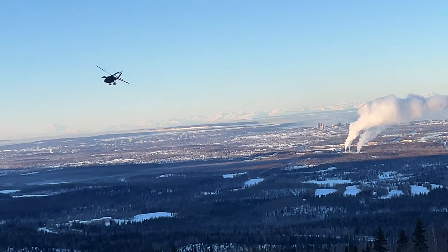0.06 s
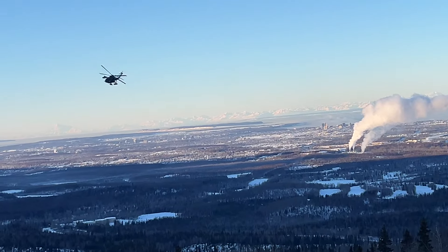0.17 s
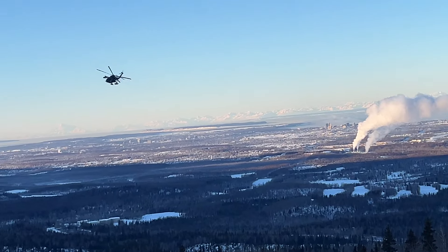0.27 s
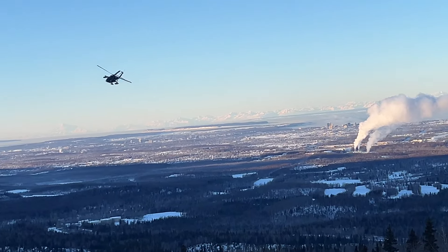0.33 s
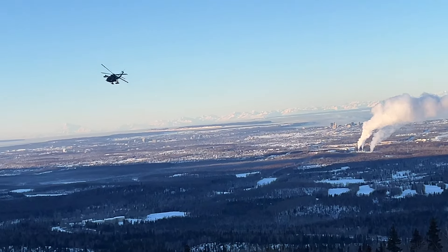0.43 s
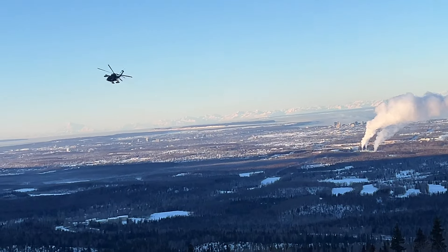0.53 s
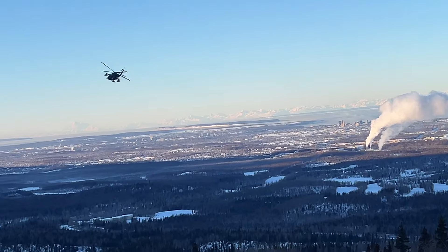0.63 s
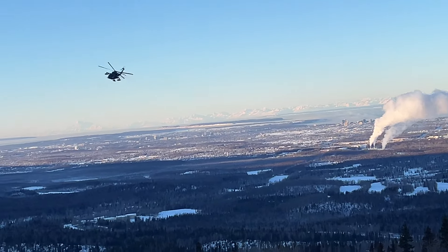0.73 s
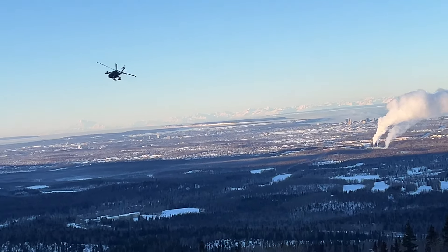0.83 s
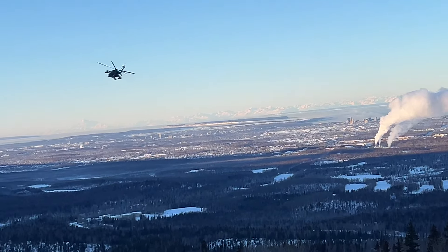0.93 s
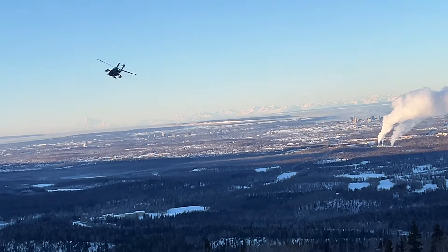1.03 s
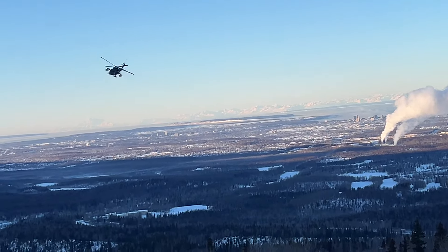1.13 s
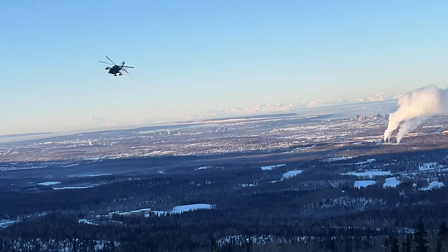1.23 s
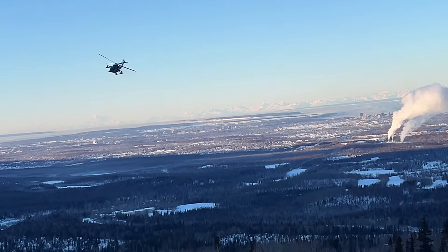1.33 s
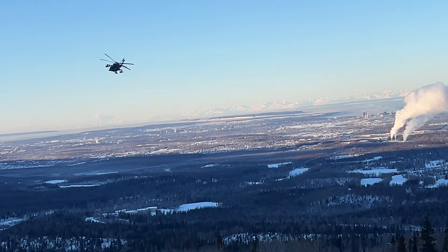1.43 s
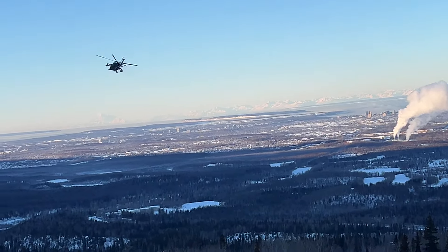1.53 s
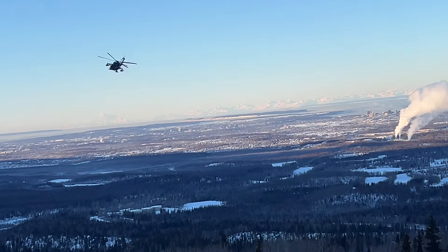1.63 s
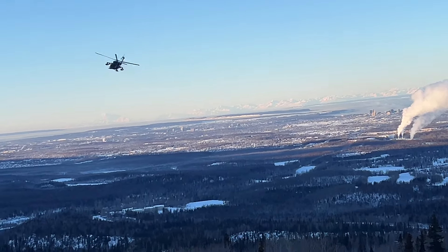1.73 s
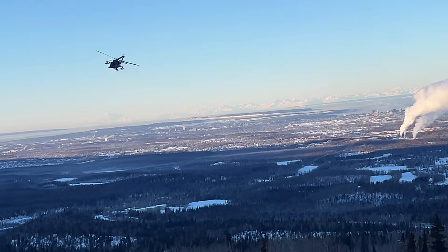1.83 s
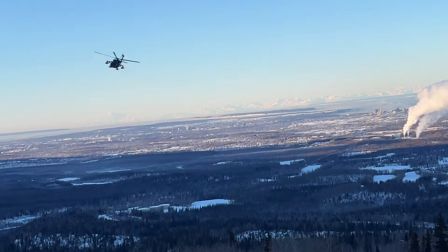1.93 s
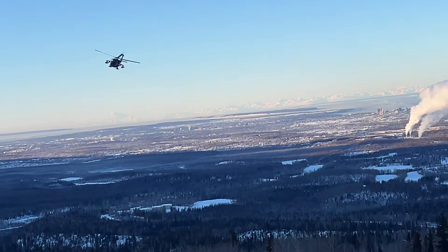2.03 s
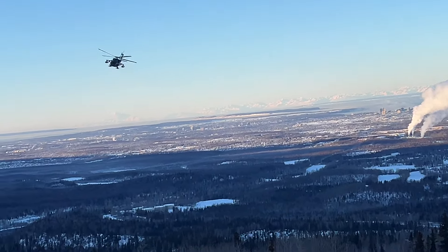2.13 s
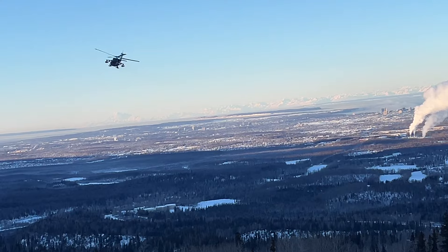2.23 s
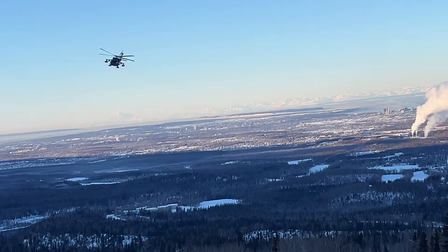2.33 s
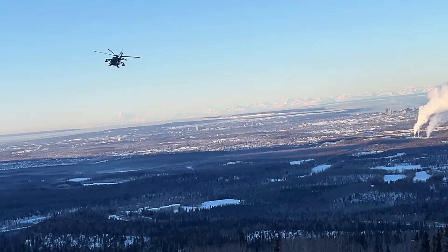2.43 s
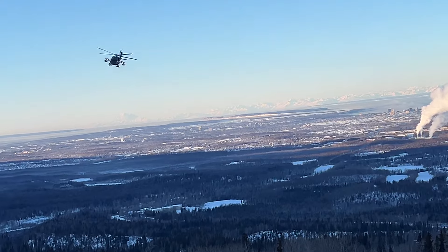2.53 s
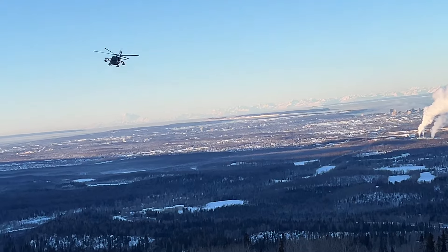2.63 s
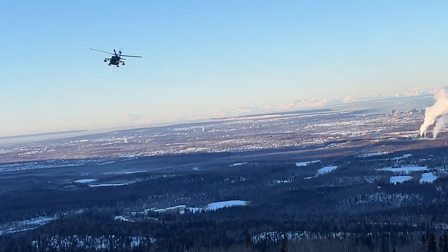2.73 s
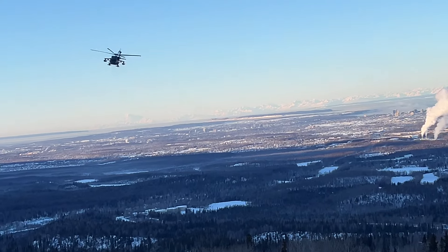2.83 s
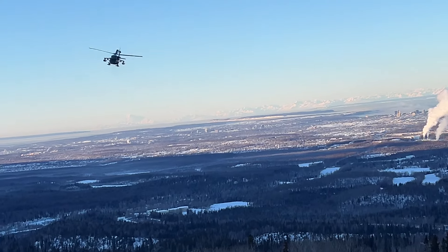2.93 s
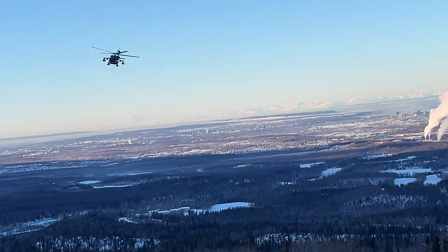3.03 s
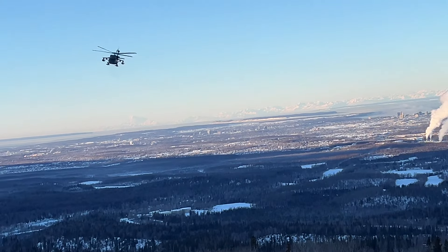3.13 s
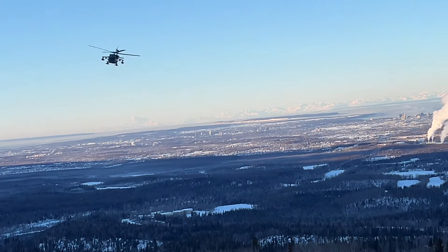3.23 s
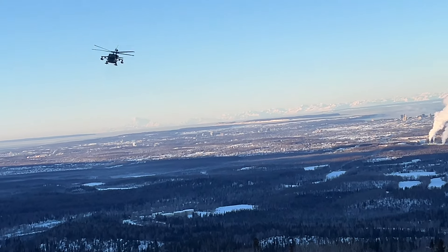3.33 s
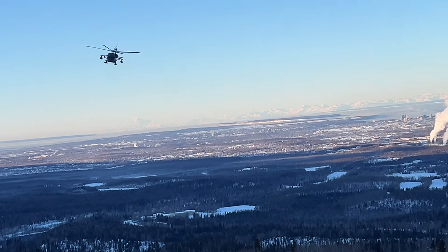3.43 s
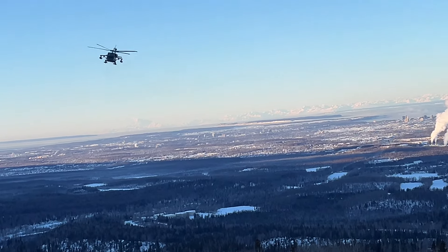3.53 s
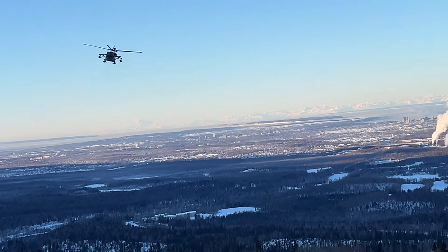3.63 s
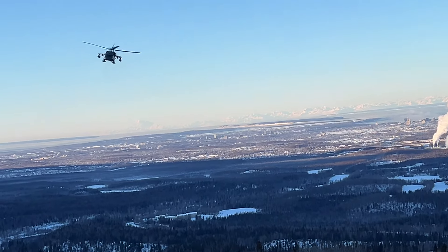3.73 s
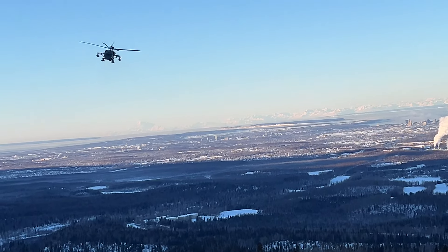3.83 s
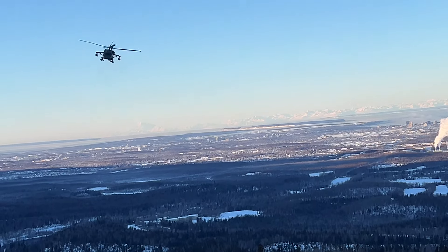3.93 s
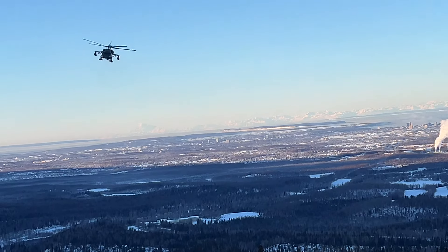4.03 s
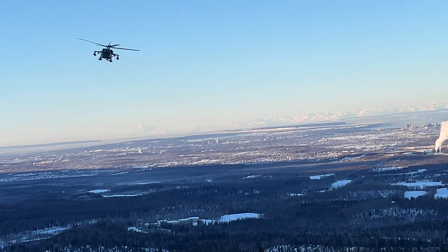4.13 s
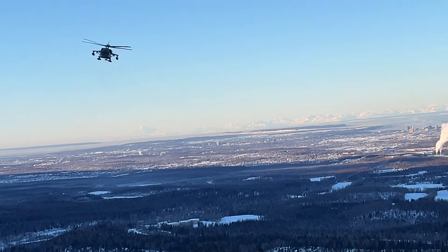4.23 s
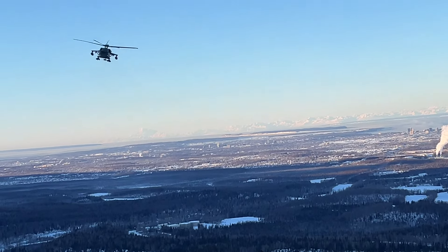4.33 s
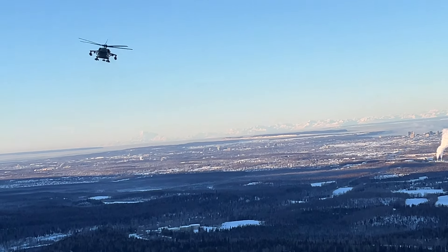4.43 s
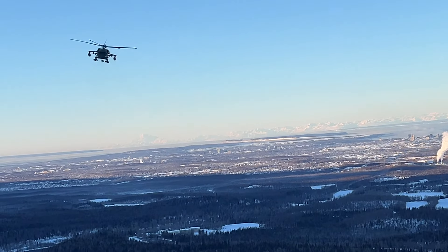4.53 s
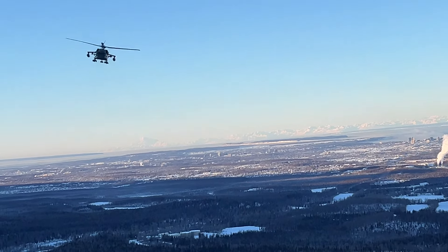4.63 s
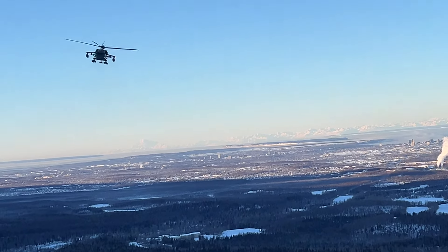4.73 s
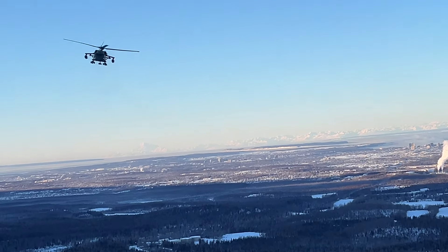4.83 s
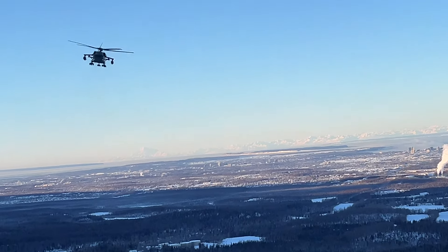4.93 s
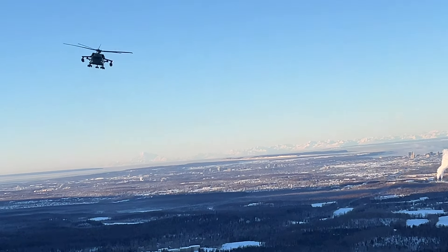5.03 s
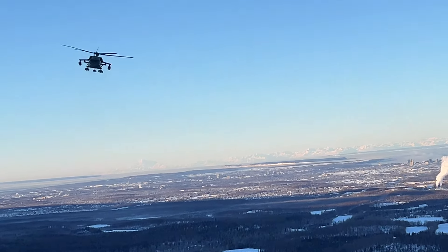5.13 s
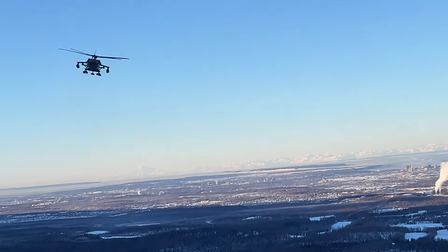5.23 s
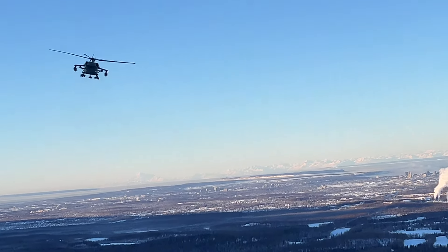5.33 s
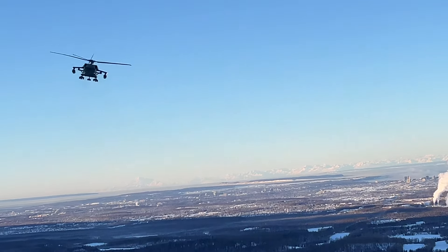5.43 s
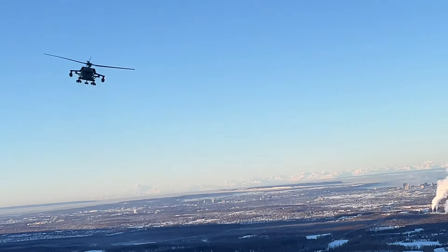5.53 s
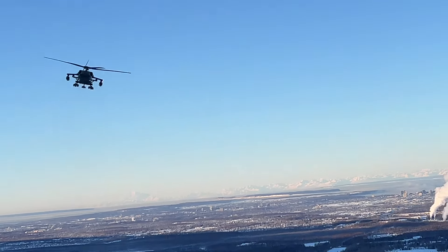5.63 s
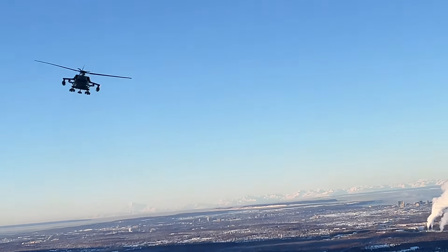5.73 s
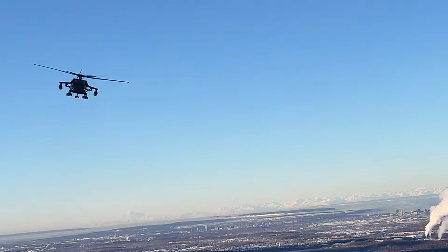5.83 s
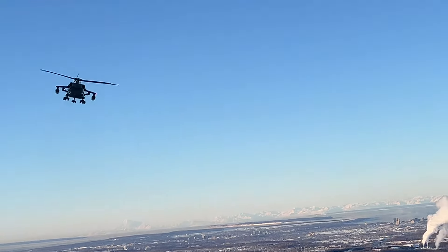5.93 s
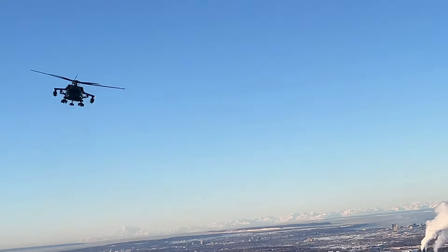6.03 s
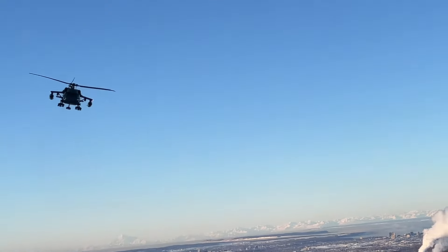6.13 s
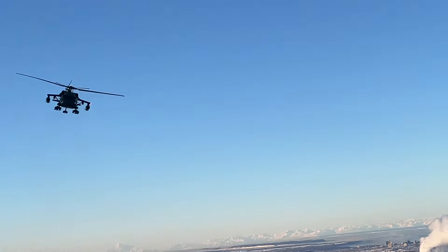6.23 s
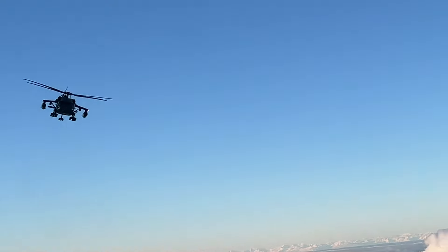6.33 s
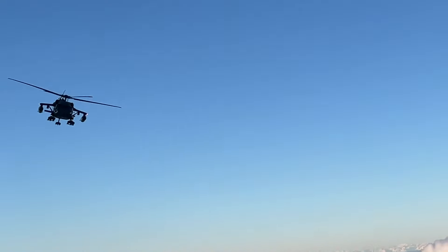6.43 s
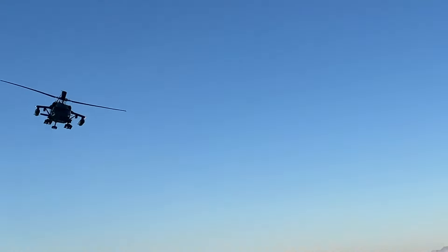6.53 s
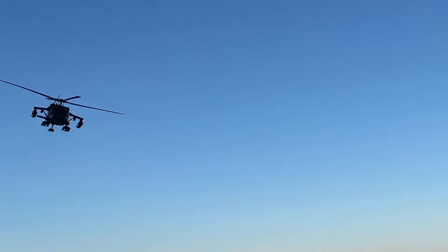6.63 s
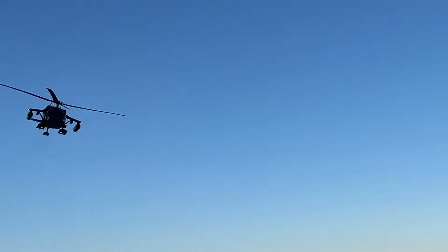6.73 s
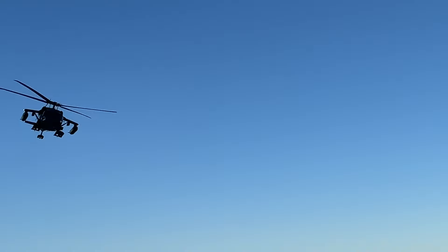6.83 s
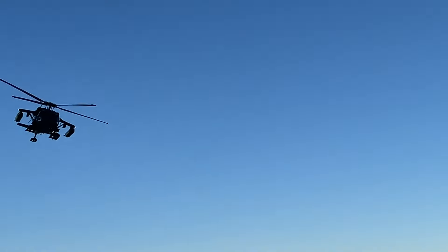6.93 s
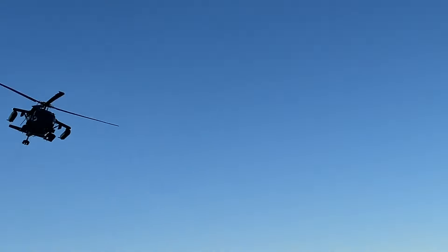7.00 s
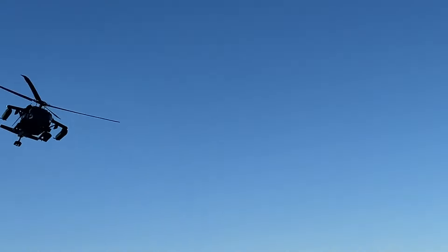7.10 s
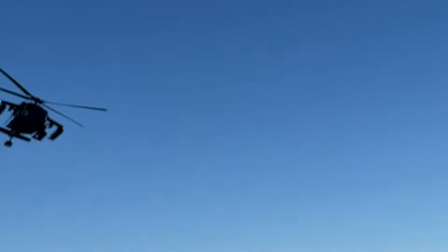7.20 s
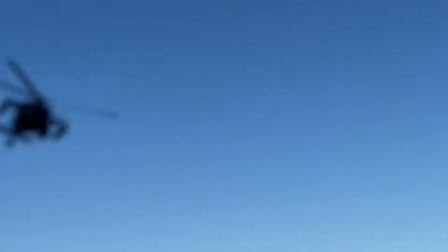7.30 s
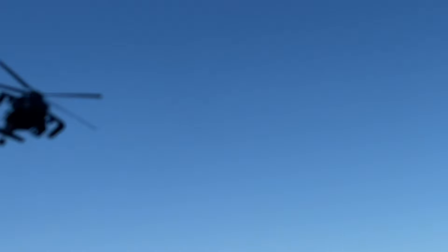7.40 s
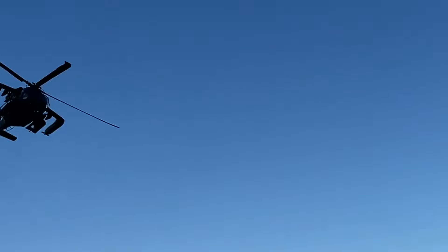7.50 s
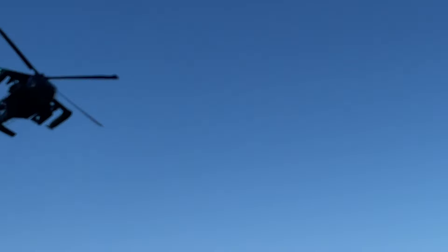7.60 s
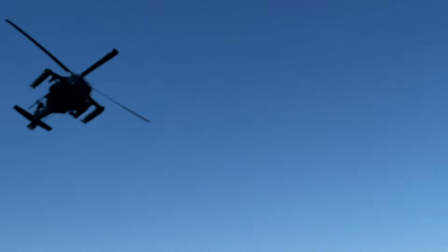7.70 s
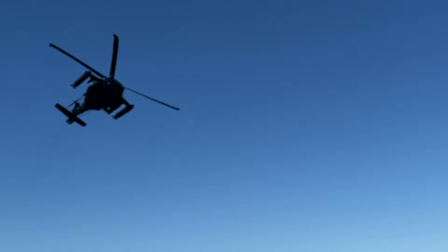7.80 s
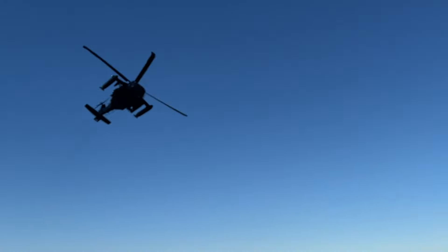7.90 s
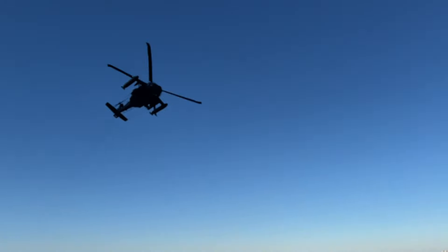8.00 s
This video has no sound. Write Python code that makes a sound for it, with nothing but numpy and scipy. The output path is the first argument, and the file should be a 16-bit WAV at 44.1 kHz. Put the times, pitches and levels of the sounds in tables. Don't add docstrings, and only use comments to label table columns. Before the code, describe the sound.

A military helicopter approaches over open snowy country, tail rotor buzz giving way to heavy blade thump, then sharp slaps and roar close overhead.

```python
import sys
import numpy as np
from scipy import signal
from scipy.fft import rfft, irfft, next_fast_len
from scipy.io import wavfile

SR = 44100
rng = np.random.default_rng(int(sys.argv[2]) if len(sys.argv) > 2 else 0)


def to_linear_factor(level_db):
    exponent = np.asarray(level_db, float) / 20
    return 10 ** exponent


def inscribe(sig):
    pcm = np.round(np.clip(np.atleast_2d(sig).T, -1, 1) * 32767)
    wavfile.write(sys.argv[1], SR, pcm.astype(np.int16))


N = 355446
T = np.arange(N) / SR
PAD = next_fast_len(N + SR // 4)
HZ = np.arange(PAD // 2 + 1) * SR / PAD + 1e-3

PASS_S, MISS_M, SPEED_M_S = 8.03, 23.65, 30.3
FIRST_PASS, GEAR_RATIO = -.465, 4.61

# t/s, rate/(passes/s)
BLADE_RATE = [(0.0, 19.48), (1.0, 19.606), (2.0, 19.66), (2.6, 19.911), (3.2, 20.056), (4.0, 20.123),
              (5.0, 20.103), (6.0, 20.162), (6.5, 20.29), (7.0, 20.26), (7.4, 20.073), (7.7, 19.78),
              (8.06, 19.539)]
# t/s, level/dB, sharpness/dB
MAIN_BEAT = [(0, -40.5, 4), (.8, -42.5, 8.5), (1.5, -33, -12), (2.1, -27, -18), (3, -22, -2.5),
             (3.6, -21.5, -1), (4.9, -20.5, 1.5), (6.4, -17.5, 2), (7.1, -19, 3), (7.7, -16.5, -4.5),
             (8.06, -18.5, -8.5)]
# f/Hz, level/dB
DEEP_COLOUR = [(15, -31), (22, -19), (40, 12), (55, -20), (90, -75)]
BOOM_COLOUR = [(15, -64), (22, -22), (40, -10), (60, 2), (85, 1), (110, -8.5), (150, -24), (300, -117)]
THUMP_COLOUR = [(50, -66), (80, -11.5), (110, 5), (160, 0), (200, -11.5), (280, -36.5), (500, -76)]
EDGE_COLOUR = [(100, -18), (180, 1.5), (220, 2), (300, -3), (450, -13.5), (800, -27), (1500, -64)]
# t/s, level/dB, brightest f/Hz
SWISH = [(0, -54, 2900), (.8, -55.5, 2940), (1.4, -46, 3070), (1.9, -54, 3150), (2.9, -50.5, 2570),
         (3.45, -48.5, 4430), (3.9, -57, 3530), (4.3, -47.5, 2900), (5.2, -49.5, 2000), (5.8, -42.5, 2740),
         (6.3, -44, 3700), (6.9, -35.5, 2900), (7.4, -35.5, 3100), (7.7, -31, 3600), (8.06, -51, 3500)]

# t/s, peak level/dB, brightness/dB
SLAPS = [(0.261, -48, -23), (3.158, -17, -28), (3.207, -13, -42), (3.583, -17, -29), (4.004, -23, -35),
         (4.999, -16.5, -30), (6.124, -9, -45), (6.585, -18, -29), (7.159, -14, -26), (7.775, -9.5, -31),
         (7.827, -7, -17), (7.879, -8.5, -16), (7.928, -7, -19.5), (7.979, -14, -7), (8.03, -15.5, -11)]
# f/Hz, level/dB
SLAP_COLOUR = [(100, -30), (280, -3), (600, 0), (800, -3), (1100, -14), (1800, -22), (3000, -40)]
# f/Hz, level/dB
FIZZ_COLOUR = [(500, -14), (1200, 4), (2500, 4), (4500, 0), (6500, 1), (9000, -3), (14000, -26)]

# t/s, lead/(tail passes)
TAIL_LEAD = [(0, -.05), (1, -.22), (2, -.33), (2.5, -.35), (3, -.45), (4, -.68), (5, -.85), (6, -.95),
             (7, -1.03), (7.4, -.98), (8.06, -.5)]
# t/s, level/dB, brightness/dB
TAIL_BEAT = [(0, -24, -13), (.4, -23.5, -12.5), (.7, -26, -4.5), (1, -26.5, -4.5), (1.4, -24, -7),
             (2, -27.5, -1), (2.6, -28, 0), (3, -30, -1), (3.6, -37.5, 6.5), (4.1, -46.5, 10),
             (4.7, -36, -4), (5.3, -28.5, -16.5), (5.9, -25.5, -15.5), (6.5, -21.5, -23), (7, -18.5, -18),
             (7.4, -17.5, -11.5), (7.7, -15, -15), (8.06, -17.5, -19)]
# f/Hz, level/dB
BUZZ_COLOUR = [(60, 0.5), (90, -4), (180, 2), (280, 0), (370, -10), (500, -20), (900, -86)]
RASP_COLOUR = [(200, -36), (300, -54), (370, -3.5), (460, 1.5), (640, -2), (760, -12), (950, -40),
               (1500, -100)]
CRACK_COLOUR = [(400, -13), (700, -3.5), (1100, 0), (1500, -1.5), (1900, -12.5), (2400, -34), (4000, -89)]
SIZZLE_COLOUR = [(1200, 7), (2100, 6.5), (3300, 13), (4200, -20.5), (7000, -49)]
SIZZLE_TOP_COLOUR = [(2500, -53), (4200, 5), (6500, 14.5), (9000, -8.5), (15000, -52), (17000, -40)]

# t/s, level/dB
WHINE = [(0, -75), (1.5, -48), (1.9, -58), (2.55, -67), (2.8, -53), (3.5, -52), (4.2, -43.5), (4.6, -38.5),
         (4.8, -43), (5.5, -40), (6.5, -36), (6.8, -23.5), (7.1, -28.5), (7.3, -27), (7.55, -32),
         (8.06, -35)]
# f/Hz, level/dB, middle t/s, length/s, flutter/rad
GEAR_TONES = [(2950, -46, 2.8, .6, 9), (2340, -49, 3.3, .35, 1.5), (3020, -43, 5.58, .26, 2.6),
              (3919, -57, 3.4, .3, 1.2), (3919, -49, 5.65, .3, 4), (5491, -59, 2.5, .5, .9),
              (5491, -53, 5, .8, 1.5), (6266, -60, 4.3, .4, 1.2), (7031, -49, 3.42, .12, 2.5),
              (7031, -55, 5.7, .7, .9), (8640, -57, 2.3, .5, 2.5), (8640, -50, 4.3, .45, 2.5),
              (8640, -50, 5.6, .4, 2.5)]
# f/Hz, width/Hz, level/dB
DUCTS = [
    (1577, 110, 0),
    (2330, 170, 1),
    (3020, 120, -7),
]

# t/s, level/dB
EXHAUST = [(0, -29.5), (.5, -29.5), (1.6, -31), (2.8, -28.5), (3.5, -28), (4.5, -31.5), (6.2, -33),
           (7, -27.5), (8.06, -27.5)]
# f/Hz, level/dB
AIR_COLOUR = [(25, -27), (60, -8.5), (130, -9), (220, -7), (500, -9.5), (1000, -18.5), (2000, -23.5),
              (2600, -24), (5000, -34), (8000, -23.5), (12000, -24.5), (16000, -58)]
# t/s, length/s, lift/dB
CLEARINGS = [(0, 0.082, 16.5), (0.394, 0.018, 2.5), (0.742, 0.072, 4), (0.992, 0.044, 5.5),
             (1.453, 0.26, -6), (2.118, 0.33, 6), (2.767, 0.11, 7), (3.046, .1, 7), (3.42, 0.14, 10),
             (3.653, 0.034, -3), (3.938, 0.24, 4), (4.58, 0.11, 7), (5.092, 0.17, 3.5), (5.572, .1, 4),
             (5.81, 0.063, -1.5), (5.917, 0.03, 3), (6.8, 0.078, 3.5), (7.354, 0.087, 3.5),
             (7.555, 0.045, -4), (7.72, 0.03, 0.5)]
# f/Hz, level/dB
SCATTER = [(30, -36), (300, -28), (1000, -17), (2500, -14), (5000, -16), (8500, -13), (9600, -38),
           (11800, -17), (13200, -38), (14300, -38), (15500, -18)]

# f/Hz, phase/(half
PORT_PHASE = [(60, .012), (300, .025), (700, .06), (1800, .045), (3500, .11), (5200, .02), (8400, -.03),
              (9000, -.22), (9900, -.475), (10500, -.53), (12100, -1), (13450, -1.47), (14050, -1.535),
              (15800, -2)]
# f/Hz, level/dB
LEFT_DB = [(60, -.2), (380, -.4), (800, .4), (1400, 1.1), (2600, 0), (4500, .9), (9000, 0)]


def main_rotor():
    phase = blade_phase() + .22
    boom_db, sharp_db = in_time(MAIN_BEAT)
    near_edge_db = -11.5 + 1.42 * nearness_db() + 0.47 * sharp_db
    far_edge_db = -30.5 - 2.0 * T
    edge_gain = to_linear_factor(near_edge_db) + to_linear_factor(far_edge_db)

    blades = passes(phase, spread_db=.6)
    pulse = to_linear_factor(boom_db + 1.5) * coloured(blades, BOOM_COLOUR)
    pulse += to_linear_factor(boom_db + sharp_db) * coloured(blades, THUMP_COLOUR)
    pulse += to_linear_factor(-41) * coloured(blades, DEEP_COLOUR)
    edges = passes(phase, spread_db=1.8)
    pulse += edge_gain * to_linear_factor(-3.5) * coloured(edges, EDGE_COLOUR)

    echo_s, echo_top_hz = 0.01375, 250
    echo = to_linear_factor(-13.5) * np.exp(-2j * np.pi * HZ * echo_s) / (1 + (HZ / echo_top_hz) ** 2)
    return through(pulse, 1 + echo) / 1.055 + tip_swish(phase)


def tip_swish(phase):
    level_db, bright_hz = in_time(SWISH)
    puff_s, width_octaves, skirt = .0021, .42, 0.06
    swish, white = 0, rng.standard_normal(N)
    for hz in np.geomspace(1300, 11000, 8):
        puffs = np.abs(passes(phase + rng.uniform(-.02, 0), spread_db=1.8))
        gate = signal.lfilter([1], np.poly([np.exp(-1 / (puff_s * SR))] * 2), puffs)
        band = band_noise(white, hz / 1.367, hz * 1.07)
        octaves_off = np.log2(hz / bright_hz)
        weight = skirt + np.exp(-.5 * (octaves_off / width_octaves) ** 2)
        swish = swish + band * gate * weight / hz
    return to_linear_factor(level_db + 0.33 * clear_db()) * rms_one(swish)


def slaps():
    onset_s, peak_db, bright_db = np.transpose(SLAPS)
    crest_delay_s, burst_s = .0015, .002
    at = ((onset_s + crest_delay_s) * SR).astype(int)
    low, high = np.zeros((2, N))
    low[at] = -to_linear_factor(peak_db)
    high[at - 40] = to_linear_factor(peak_db + bright_db)
    burst = np.exp(-np.arange(300) / (burst_s * SR))
    high = signal.fftconvolve(high, burst)[:N] * rng.standard_normal(N)
    body = to_linear_factor(at_hz(SLAP_COLOUR, HZ))
    fizz = to_linear_factor(at_hz(FIZZ_COLOUR, HZ))
    pulse = through(low, body) / irfft(body)[0]
    return pulse * to_linear_factor(7.5) + through(high, fizz) * to_linear_factor(14.0)


def tail_rotor():
    phase = tail_phase()
    buzz_db, bright_db = in_time(TAIL_BEAT)
    bank_end_s, bank_fade_s = 1.29, 0.067
    facing_end_s, facing_fade_s = .45, 0.033
    banking = 1 / (1 + np.exp((T - bank_end_s) / bank_fade_s))
    facing = 1 / (1 + np.exp((T - facing_end_s) / facing_fade_s))
    rasp_db = buzz_db + bright_db
    crack_db = buzz_db + 0.75 * bright_db - 8.5 + 10 * banking + 4.8 * facing
    sizzle_db = buzz_db + 0.58 * bright_db - 28.5 + 9 * facing
    sizzle_db = sizzle_db - 0.13 * nearness_db() + clear_db()

    wander = phase + .006 * drift(25)
    even = passes(phase, spread_db=.8)
    uneven = passes(wander, spread_db=3.5)
    pair_db = 1.2 * np.cos(np.pi * np.floor(wander))
    cracks = passes(wander, spread_db=1.4) * to_linear_factor(pair_db)

    buzz = to_linear_factor(buzz_db + 0.32 * drift(1.5)) * coloured(even, BUZZ_COLOUR)
    rasp = to_linear_factor(rasp_db + 0.4 * drift(1.4)) * coloured(even, RASP_COLOUR)
    crack = to_linear_factor(crack_db) * coloured(cracks, CRACK_COLOUR)
    highs = coloured(uneven, SIZZLE_COLOUR) + to_linear_factor(-9.5) * coloured(uneven, SIZZLE_TOP_COLOUR)
    sizzle = to_linear_factor(sizzle_db + 3.0) * highs
    return -(buzz + rasp + crack + sizzle)


def turbines():
    return gear_tones() + intake_ducts() + compressor_whine()


def gear_tones():
    nominal_passes_per_s = 20.12
    clock_s = (blade_phase() - FIRST_PASS) / nominal_passes_per_s
    tones = 0
    for hz, db, middle_s, length_s, flutter_rad in GEAR_TONES:
        gain = to_linear_factor(db + 2.5 * drift(4)) * bell(middle_s, length_s)
        tones = tones + gain * np.sin(2 * np.pi * hz * clock_s + flutter_rad * drift(25))
    return tones


def intake_ducts():
    open_s, rise_db_s = 6.95, 20
    ducts = 0
    for hz, width_hz, db in DUCTS:
        ducts = ducts + to_linear_factor(db + 1.5 * drift(3)) * narrow_noise(hz, width_hz)
    chop = to_linear_factor(10.8 * np.cos(2 * np.pi * GEAR_RATIO * blade_phase()))
    return to_linear_factor(-42 + rise_db_s * np.minimum(T - open_s, 0)) * ducts * chop


def compressor_whine():
    whine = narrow_noise(15670, width_hz=1000) * to_linear_factor(1.1 * drift(30))
    level_db = in_time(WHINE)[0] + 0.9 * clear_db() + 4.5 * drift(12)
    return to_linear_factor(level_db) * rms_one(whine)


def air_roar(patchy_db, beat_db):
    splits_hz = [500, 2000, 4500, 9500]
    edges_hz = 28 * 2 ** np.arange(0, 9.6, .5)
    together = drift(1.9)
    beat = np.cos(2 * np.pi * (blade_phase() + 0.2))
    white = rng.standard_normal((2, 2, N))
    groups = np.zeros((len(splits_hz) + 1, 2, N))
    for k, (low_hz, high_hz) in enumerate(zip(edges_hz, edges_hz[1:])):
        hz = np.sqrt(low_hz * high_hz)
        band = band_noise(white[k % 2], low_hz, high_hz)
        flicker_db = patchy_db * (0.097 * together + drift(7.2))
        gain = to_linear_factor(at_hz(AIR_COLOUR, hz) + flicker_db + beat_db * beat)
        groups[np.searchsorted(splits_hz, hz)] += gain * band

    load_db, near_db, lift_db = in_time(EXHAUST)[0], nearness_db(), clear_db()
    rumble_db = -24 + 0.55 * (load_db - load_db.mean()) + 0.32 * near_db
    rush_db = -32 + near_db + 0.57 * lift_db
    hiss_db = -29 + 1.48 * near_db + lift_db
    absorb_db_m = 0.24
    top_db = -26 + 0.99 * near_db + 1.77 * lift_db - absorb_db_m * distance_m() + 3.4 * drift(21)
    tail_seen = 1 - bell(4.7, 1.0)
    exhaust_db = load_db + 3.5 * tail_seen * np.cos(2 * np.pi * (tail_phase() - .03))

    roar = 0
    for group, level_db in zip(groups, [rumble_db, exhaust_db, rush_db, hiss_db, top_db]):
        roar = roar + to_linear_factor(level_db) * rms_one(group)
    return roar


def blade_phase():
    return FIRST_PASS + np.cumsum(in_time(BLADE_RATE)[0]) / SR


def tail_phase():
    return GEAR_RATIO * blade_phase() + in_time(TAIL_LEAD)[0] - .3


def passes(phase, spread_db):
    turns = np.floor(phase)
    marks = np.diff(turns, prepend=turns[0]) > 0
    return -1. * marks * to_linear_factor(spread_db * rng.standard_normal(N))


def distance_m():
    return np.hypot(MISS_M, SPEED_M_S * (T - PASS_S))


def nearness_db():
    return -20 * np.log10(distance_m() / MISS_M)


def clear_db():
    return sum(lift_db * bell(s, length_s) for s, length_s, lift_db in CLEARINGS)


def bell(middle_s, length_s):
    return np.exp(-.5 * ((T - middle_s) / length_s) ** 2)


def drift(rate_hz):
    r = np.exp(-80 * np.pi * rate_hz / SR)
    white = rng.standard_normal(N // 40 + 2002)
    slow = signal.lfilter([1], [1, -2 * r, r * r], white)[2000:]
    return np.interp(np.arange(N) / 40, np.arange(len(slow)), rms_one(slow))


def narrow_noise(hz, width_hz):
    lowpass = signal.butter(2, width_hz / 2, fs=SR, output="sos")
    slow = signal.sosfilt(lowpass, rng.standard_normal((2, N)))
    turn = 2 * np.pi * hz * T
    return rms_one(slow[0] * np.cos(turn) + slow[1] * np.sin(turn))


def band_noise(white, low_hz, high_hz):
    return signal.sosfilt(signal.butter(2, [low_hz, high_hz], "band", fs=SR, output="sos"), white)


def in_time(rows):
    s, *columns = np.transpose(rows)
    return [np.interp(T, s, c) for c in columns]


def at_hz(points, hz):
    table_hz, values = np.transpose(points)
    return np.interp(np.log(hz), np.log(table_hz), values)


def through(x, response):
    return irfft(rfft(x, PAD) * response, PAD)[..., :N]


def coloured(x, spectrum):
    return rms_one(through(x, to_linear_factor(at_hz(spectrum, HZ))))


def rms_one(x):
    return x / np.sqrt(np.mean(x ** 2) + 1e-20)


def scene():
    direct, scattered = air_roar(patchy_db=1.5, beat_db=2.0)
    ship = main_rotor() + slaps() + tail_rotor() + turbines() + direct
    sides = through(scattered, to_linear_factor(at_hz(SCATTER, HZ)))
    return ship + sides * [[1], [-1]]


def low_pass(x):
    return signal.sosfilt(signal.butter(12, 17140, fs=SR, output="sos"), x)


def record(dry):
    smear_turns, smear_top_hz = 1.15, 2800
    smear = smear_turns * np.log(1 + smear_top_hz / (HZ + 5))
    side = np.array([[.5], [-.5]])
    turns = smear + side * at_hz(PORT_PHASE, HZ)
    ports = to_linear_factor(side * at_hz(LEFT_DB, HZ)) * np.exp(2j * np.pi * turns)
    ceiling, cutoff_hz, dc_offset = 1.3, 15850, -.0028
    wet = ceiling * np.tanh(through(dry, ports) / ceiling)
    wet = through(wet, 1 / (1 + (HZ / cutoff_hz) ** 300))
    return low_pass(wet + dc_offset)


dry = scene()
out = record(dry)
inscribe(out)
```